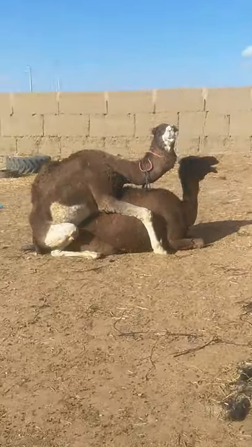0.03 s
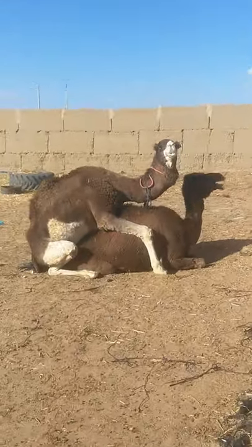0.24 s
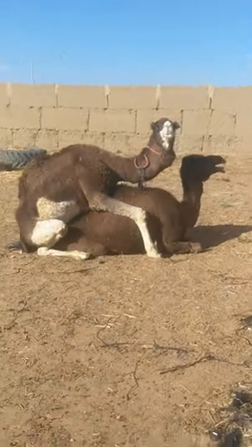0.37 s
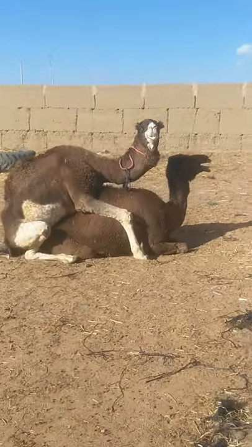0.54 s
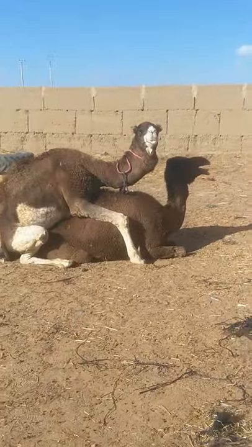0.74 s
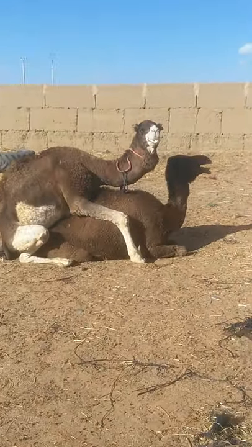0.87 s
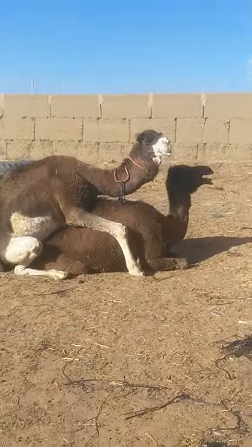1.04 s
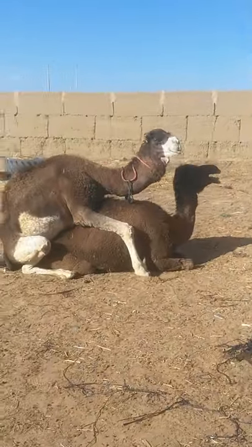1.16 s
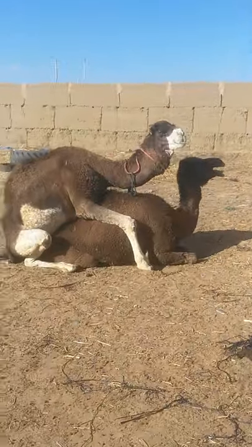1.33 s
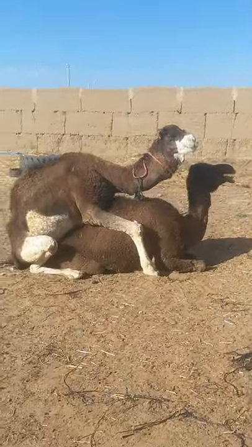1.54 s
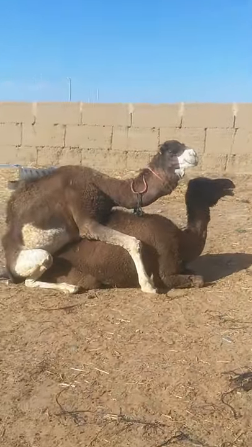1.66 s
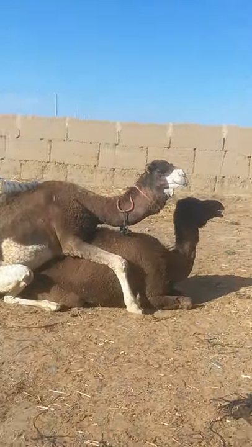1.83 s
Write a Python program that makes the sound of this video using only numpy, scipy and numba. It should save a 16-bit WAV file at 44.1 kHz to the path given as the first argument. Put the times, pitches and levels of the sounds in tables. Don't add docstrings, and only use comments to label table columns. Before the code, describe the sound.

A camel bellows once, low and rough, in a walled sandy yard with faint distant birds.

```python
import sys
import numpy as np
from scipy import signal
from scipy.io import wavfile
from scipy.ndimage import uniform_filter1d
from numba import njit

SR = 44100
rng = np.random.default_rng(int(sys.argv[2]) if len(sys.argv) > 2 else 0)


def master_out(mix):
    frames = np.transpose(np.atleast_2d(mix))
    ceiling = np.clip(frames, -1, 1)
    pcm = np.round(ceiling * 32767).astype(np.int16)
    wavfile.write(sys.argv[1], SR, pcm)


def attenuation_scalar(level_db):
    decades = np.asarray(level_db, float) / 20
    return 10 ** decades


N = 83790
TIME = np.arange(N) / SR


def curve(table, col):
    rows = np.array(table)
    return np.interp(TIME, rows[:, 0], rows[:, col])


def unit(x):
    return x / np.sqrt(np.mean(x ** 2))


def walk(rate):
    hold = int(SR / rate)
    steps = np.repeat(rng.standard_normal(N // hold + 1), hold)
    return 2.9 * uniform_filter1d(uniform_filter1d(steps, hold), hold)[:N]


def hump(start, length):
    return np.sin(np.pi * np.clip((TIME - start) / length, 0, 1))


def tone(hz):
    return np.sin(2 * np.pi * np.cumsum(hz) / SR)


@njit
def svf(x, hz, width):
    y, b, l = np.empty(len(x)), 0., 0.
    for i in range(len(x)):
        g, k = np.tan(np.pi * hz[i] / SR), width / hz[i]
        v = (b + g * (x[i] - l)) / (1 + g * (g + k))
        b, l, y[i] = 2 * v - b, l + 2 * g * v, k * v
    return y


def resonance(x, hz, width):
    return svf(svf(x, hz, float(width)), hz, float(width))


def band(x, hz, width):
    return svf(x, np.full(N, float(hz)), float(width))


def noise_band(noise, hz, width):
    return unit(band(band(noise, hz, width), hz, width))


def steep(x, hz, kind):
    return signal.sosfilt(signal.butter(8, hz, kind, fs=SR, output="sos"), x)


# (frequency [Hz], level [dB per Hz])
YARD_COLOUR = [(35, -25), (70, -17.5), (200, -18.5), (400, -24), (700, -24), (1600, -19), (2300, -31.5),
               (3170, -26), (4500, -19.5)]
YARD_DB, YARD_TOP_HZ = -48.5, 5400
DUCK_DB, DUCK_FULL_HZ = -11, 2500
HISS_DB, HISS_DUCK_DB = -70, -1.5


def yard(duck):
    wash, swell, shape = 0, walk(3.1), np.array(YARD_COLOUR)
    for hz in 35 * 2 ** np.arange(0, 7.5, .5):
        db = np.interp(np.log(hz), np.log(shape[:, 0]), shape[:, 1])
        db = db + .5 * swell + 2 * walk(22)
        db = db + DUCK_DB * duck * min(hz / DUCK_FULL_HZ + 0.19, 1)
        noise = noise_band(rng.standard_normal(N), hz, hz / 2.5)
        wash = wash + attenuation_scalar(db + YARD_DB) * noise * np.sqrt(hz / 1000)
    hiss = unit(band(rng.standard_normal(N), 7300, 21000))
    hiss_db = HISS_DB + HISS_DUCK_DB * duck + 1.1 * walk(17)
    return steep(wash, YARD_TOP_HZ, "low") + attenuation_scalar(hiss_db) * hiss


# (time [s], level [dB])
GUST_LEVELS = [(0, -64.5), (.11, -62), (.2, -58), (.26, -59), (.34, -69.5), (.5, -73), (.7, -66.5),
               (.95, -66), (1.1, -71), (1.386, -70.5), (1.682, -63), (1.8, -69), (1.9, -74)]


def breeze():
    flutter = noise_band(rng.standard_normal(N), 65, 79)
    return attenuation_scalar(curve(GUST_LEVELS, 1) + 3.4 * walk(17)) * flutter


# (length [s], centre [Hz], level [dB])
SCUFFS = [(.028, 4500, -59), (.015, 5000, -67), (.015, 13000, -71), (.025, 11000, -68), (.3, 11500, -69),
          (.012, 9000, -72), (.03, 1200, -53), (.025, 680, -58), (.14, 1300, -64), (.1, 650, -62),
          (.12, 5000, -66)]
SCUFF_STARTS = [.298, .35, .392, .447, .3, 1.128, .065, 1.86, -.02, .02, 1.78]


def sand():
    out = 0
    for start, (length, hz, db) in zip(SCUFF_STARTS, SCUFFS):
        grit = rng.standard_normal(N) * attenuation_scalar(1.8 * walk(270))
        out = out + attenuation_scalar(db) * hump(start, length) * noise_band(grit, hz, 0.94 * hz)
    return out


# (start [s], length [s], from [Hz], to [Hz], level [dB])
SPARROW_CALLS = [(-.02, .065, 3000, 2550, -57), (0., .1, 4500, 5400, -67), (.1, .025, 3850, 3900, -60),
                 (.172, .05, 5250, 4000, -64), (.22, .042, 5950, 4600, -55), (.36, .11, 3050, 3330, -53),
                 (.575, .03, 4600, 4650, -57), (.815, .025, 5900, 4800, -60), (.91, .02, 5200, 5600, -60),
                 (1.74, .025, 5200, 5300, -67), (1.75, .075, 3250, 2650, -64.5),
                 (1.775, .035, 4800, 4700, -63), (1.81, .04, 5400, 5100, -63),
                 (1.875, .025, 4100, 3900, -64)]


def sparrows():
    out = 0
    for start, length, from_hz, to_hz, db in SPARROW_CALLS:
        hz = from_hz + (to_hz - from_hz) * np.clip((TIME - start) / length, 0, 1)
        hz = hz * (1 + .004 * walk(150))
        out = out + attenuation_scalar(db + 3.2 * walk(230)) * hump(start, length) * tone(hz)
    return out


# (start [s], length [s], pitch [Hz], level [dB])
CHEST_GRUNTS = [
    (0.145, 0.14, 125, -43.5),
    (1.609, 0.19, 131, -50),
]


def grunts():
    out = 0
    for start, length, hz, db in CHEST_GRUNTS:
        out = out + attenuation_scalar(db) * hump(start, length) * tone(hz * (1 + 0.03 * walk(11)))
    return out


def clicks_at(at, size):
    out, i = np.zeros(N), np.clip(at.astype(int), 0, N - 2)
    out[i], out[i + 1] = size * (1 - at + i), size * (at - i)
    return out


# (time [s], period jitter [share], pulse size scatter [dB],
# weak second pulse [dB down], breath [share 0-1])
ROUGHNESS = [(.14, .02, 1, 0, .35), (.2, .012, 1.2, 0, .3), (.3, .015, 1.5, 0, .28), (.33, .03, 2, 0, .25),
             (.36, .003, .6, 0, .04), (.53, .003, .6, 0, .04), (.56, .025, 2, 3, .22), (.61, .03, 2, 2, .2),
             (.65, .003, .4, 0, .035), (.83, .002, .4, 0, .03), (.9, .012, 1.3, 1.5, .1),
             (.96, .012, 1.3, 2, .1), (1.0, .004, .6, .5, .04), (1.055, .004, .6, 1, .04),
             (1.08, .008, 1.2, 7, .06), (1.1, .008, 1.2, 7, .06), (1.115, .008, 1, 1, .06),
             (1.15, .008, 1.2, 7, .06), (1.205, .012, 1.2, 6, .08), (1.24, .002, .4, 0, .03),
             (1.57, .003, .5, 0, .04), (1.61, .08, 2, 1, .7), (1.7, .12, 3, 1, .55), (1.82, .12, 4, 1, .35)]
# (time [s], level [dB])
WEAK_CLOSURES = [
    (.612, -4),
    (0.7, -2),
    (1.1005, -13),
    (1.1435, -14.5),
    (0.92, -5.5),
]
FALTER_S, STRONG_PULSE_S = .004, 1.1075
OPENING_AT, OPENING_DB, OPENING_SCATTER_DB = .32, -9.5, 1


def folds(hz):
    phase = np.cumsum(hz) / SR
    phase = phase - phase[int(STRONG_PULSE_S * SR)] % 2
    cycles = np.arange(int(phase[-1]))
    at = np.interp(cycles, phase, np.arange(N))
    chance, i = rng.standard_normal((400, 4))[:len(cycles)].T, at.astype(int)
    period, jitter = SR / hz[i], curve(ROUGHNESS, 1)[i]
    at = np.clip(at + chance[0] * jitter * period, 0, N - 2)
    size_db = chance[1] * curve(ROUGHNESS, 2)[i] - (cycles % 2 - 0.12) * curve(ROUGHNESS, 3)[i]
    for when, db in WEAK_CLOSURES:
        size_db = size_db + db * np.exp(-((at / SR - when) / FALTER_S) ** 2)
    size = attenuation_scalar(size_db) * np.sqrt(period)
    late = np.clip(at + period * (OPENING_AT + chance[2] * (0.0088 + jitter)), 0, N - 2)
    opening = clicks_at(late, size * attenuation_scalar(OPENING_DB + OPENING_SCATTER_DB * chance[3]))
    clicks = clicks_at(at, size) + opening
    puff = signal.lfilter([1], [1, -np.exp(-110 / SR)], clicks)
    return clicks, unit(puff * rng.standard_normal(N))


# (time [s], pitch [Hz], level [dB])
BELLOW = [(.145, 87.7, -46), (.19, 88.7, -35), (.258, 101.5, -30.5), (.315, 108.1, -30.5),
          (.335, 131.4, -29), (.364, 136.6, -26.5), (.43, 141, -22.5), (.505, 156, -25),
          (.552, 152.2, -24.5), (.595, 139.3, -28), (.615, 115.4, -27.5), (.65, 102.4, -28),
          (.705, 100.6, -28), (.83, 107.9, -24.5), (.9, 118.8, -24), (.965, 136.5, -23.5),
          (1.045, 142.7, -22), (1.075, 138.9, -22.5), (1.2, 138.9, -24), (1.235, 123.9, -23),
          (1.29, 112.6, -22.5), (1.398, 117.3, -23.5), (1.474, 109, -25), (1.522, 105, -25.5),
          (1.566, 100.8, -30), (1.66, 72.87, -41), (1.82, 61.76, -43.5)]
DULL_BELOW_DB, DULL_DB_PER_DB = -30, 1.5
ONSET_DULL_ABOVE_HZ, DULL_ABOVE_HZ = 2000, 1600


def tract(source, table, opening):
    out = 0
    dull_above = np.where(np.arange(N) > N // 2, DULL_ABOVE_HZ, ONSET_DULL_ABOVE_HZ)
    dull_db = DULL_DB_PER_DB * np.minimum(curve(BELLOW, 2) - DULL_BELOW_DB, 0)
    for closed_hz, open_hz, width, closed_db, open_db in table:
        hz = closed_hz + (open_hz - closed_hz) * opening
        db = closed_db + (open_db - closed_db) * opening + dull_db * (closed_hz > dull_above)
        out = out + attenuation_scalar(db) * resonance(source, hz, width)
    return out


# (time [s], mouth opening [0-1], nose opening [0-1], main ring [Hz], ring level [dB])
POSTURE = [(.14, 0.21, 0.02, 710, 1), (.3, 0.15, 0.3, 702, -2.5), (.44, 0.18, 0, 707, 0.5),
           (.51, 0.41, 0.04, 775, 4), (.59, 0.29, 0.27, 817, 2), (.63, 0.65, 0.48, 786, 3),
           (.75, 0.75, 0.67, 793, 2.5), (.83, 0.86, .9, 846, 6.5), (.94, 0.85, 1., 818, -3),
           (1.05, 0.89, 0.98, 823, 4), (1.1, 0.97, 0.98, 859, 2), (1.215, 0.92, 0.84, 825, -2),
           (1.245, 0.84, .9, 850, 4), (1.31, 0.99, 0.76, 811, 4), (1.44, 0.84, 1, 822, 1.5),
           (1.52, 0.85, 0.78, 833, 9.5), (1.6, 0.68, 0.82, 797, -2), (1.7, 0.72, 0.6, 780, -2),
           (1.8, 0.7, 1, 790, 3.5)]
# (closed [Hz], open [Hz], width [Hz], closed level [dB], open level [dB])
THROAT_RINGS = [
    (214, 209, 25.5, -4, -5.5),
    (255.7, 352.7, 52, -1, -8),
    (276, 266.3, 27.6, -26, -7.5),
    (629, 609.5, 112, -20, -9),
    (1169, 1059, 140, -9.5, -8),
    (1295, 1447.7, 115, -23.5, 3),
    (1756, 1793, 175, -4, -6),
    (2412, 2431, 222, -12, -11),
    (2578, 2680, 35, -23.5, -15.5),
]
# (closed [Hz], open [Hz], width [Hz], closed level [dB], open level [dB])
NOSE_RINGS = [
    (3270, 3537, 500, -40.5, -31.5),
    (3790, 3755, 397, -36, -28),
    (4510, 4745, 213, -39, -26),
    (5100, 5800, 350, -50, -45),
]
RING_WIDTH_HZ, THROAT_TOP_HZ = 108.3, 2800
NOSE_BREATH, NOSE_LOW_HZ, NOSE_TOP_HZ = .3, 3000, 5900
CHEST_DB, CHEST_DB_PER_HZ, CHEST_CLOSED_DB = -20.5, 0.49, -6


def camel():
    hz = uniform_filter1d(curve(BELLOW, 1), size=400)
    mouth, ring_hz = curve(POSTURE, 1), curve(POSTURE, 3)
    clicks, breath = folds(hz)
    share = curve(ROUGHNESS, 4)
    nose_share = np.clip(share + NOSE_BREATH, 0, 1)
    source = np.sqrt(1 - share) * clicks + np.sqrt(share) * breath
    nose_source = np.sqrt(1 - nose_share) * clicks + np.sqrt(nose_share) * breath

    ring = attenuation_scalar(curve(POSTURE, 4)) * resonance(source, ring_hz, RING_WIDTH_HZ)
    throat = steep(tract(source, THROAT_RINGS, mouth) + ring, THROAT_TOP_HZ, "low")
    nose = steep(tract(nose_source, NOSE_RINGS, curve(POSTURE, 2)), NOSE_LOW_HZ, "high")
    voice = throat + steep(nose, NOSE_TOP_HZ, "low")
    voice = voice / np.sqrt(uniform_filter1d(voice ** 2, size=4500) + 1e-9)

    chest_db = CHEST_DB + CHEST_DB_PER_HZ * (np.minimum(hz, 138) - 127.5)
    chest_db = chest_db + CHEST_CLOSED_DB * (1 - mouth) + walk(17)
    voice = voice + attenuation_scalar(chest_db) * tone(hz)
    fade_in = np.clip((TIME - BELLOW[0][0]) / 0.0019, 0, 1)
    fade_out = np.clip((BELLOW[-1][0] + 0.012 - TIME) / 0.1, 0, 1)
    return voice * attenuation_scalar(curve(BELLOW, 2) - 0.47) * fade_in * fade_out


# (delay [s], level [dB])
YARD_ECHOES = [
    (.0031, -8.5),
    (0.011, -13.5),
    (0.021, -12.5),
    (.041, -23),
    (.067, -28),
    (.11, -26),
]
DUCK_FROM_S, DUCK_TO_S, DUCK_EDGE_S = .54, 1.85, .05


def scene():
    duck = np.clip(np.minimum(TIME - DUCK_FROM_S, DUCK_TO_S - TIME) / DUCK_EDGE_S, 0, 1)
    background = yard(duck) + breeze() + sand()
    near = sparrows() + camel()
    echoes = sum(attenuation_scalar(db) * np.interp(TIME - lag, TIME, near, left=0) for lag, db in YARD_ECHOES)
    return (background + near + echoes + grunts())[None]


def top_cut(x):
    return signal.sosfilt(signal.butter(12, 16070, fs=SR, output="sos"), x)


def record(dry):
    low_cut = signal.butter(2, 49.3, "high", fs=SR, output="sos")
    mix = signal.sosfilt(low_cut, dry)
    return top_cut(mix)


dry = scene()
out = record(dry)
master_out(out)
```